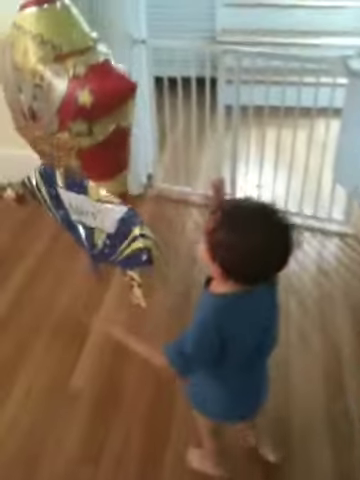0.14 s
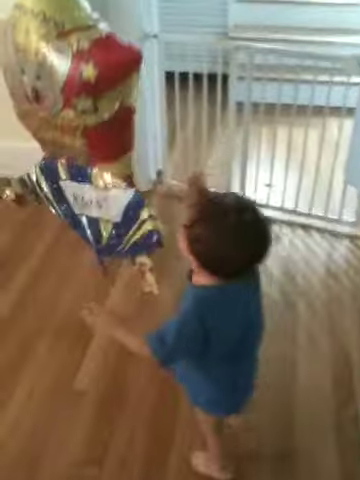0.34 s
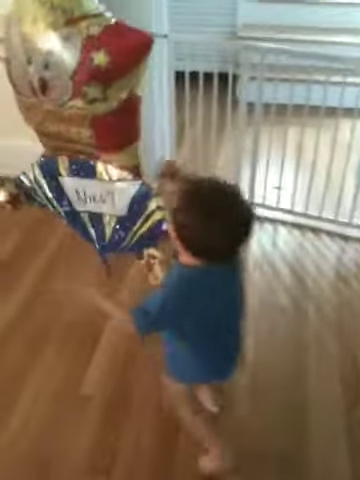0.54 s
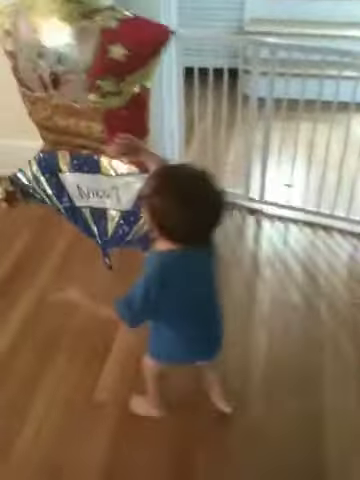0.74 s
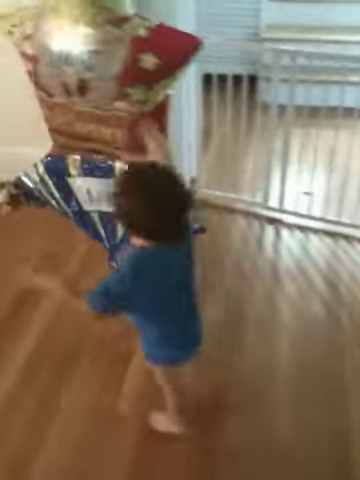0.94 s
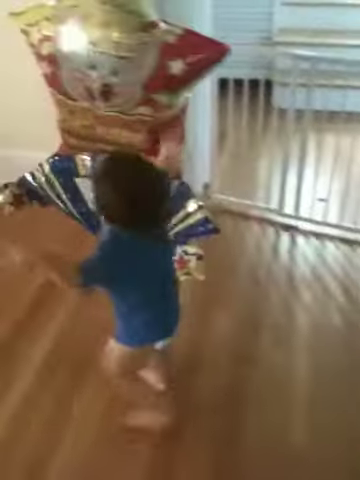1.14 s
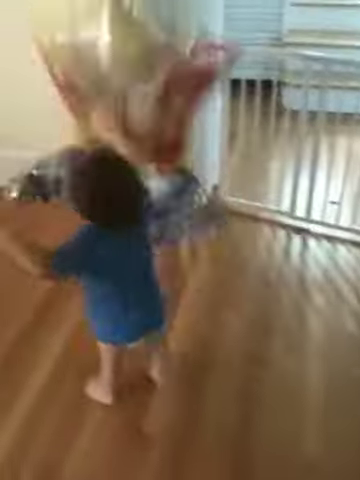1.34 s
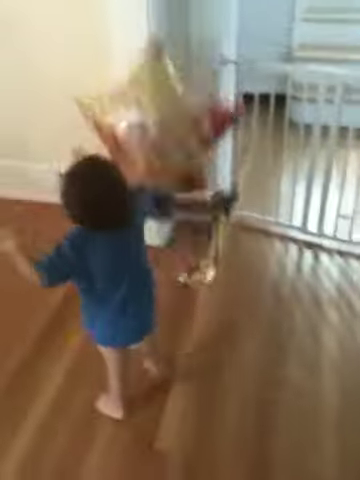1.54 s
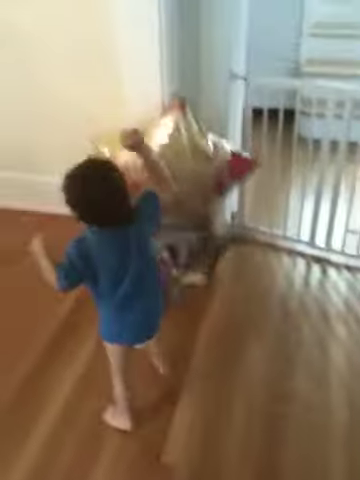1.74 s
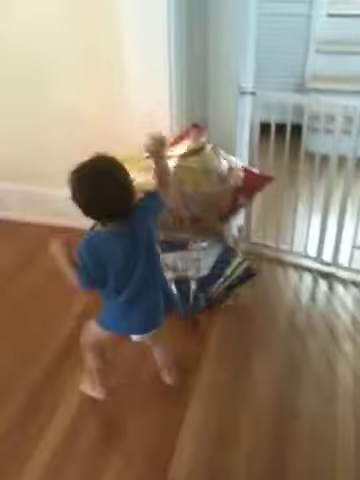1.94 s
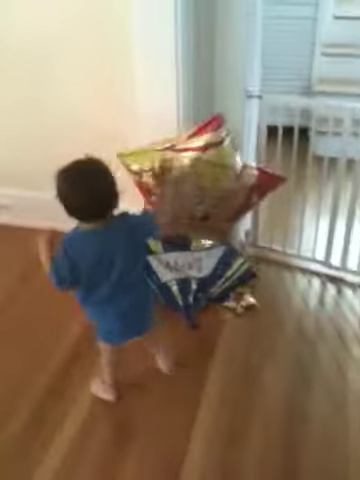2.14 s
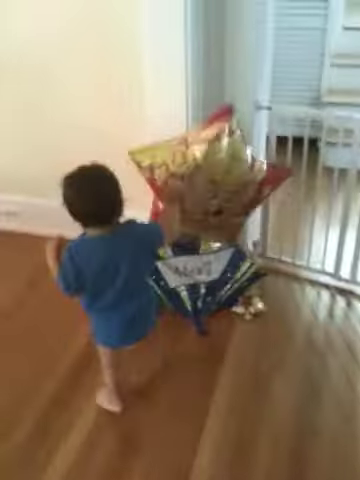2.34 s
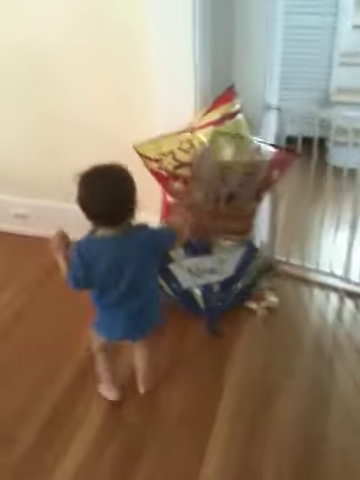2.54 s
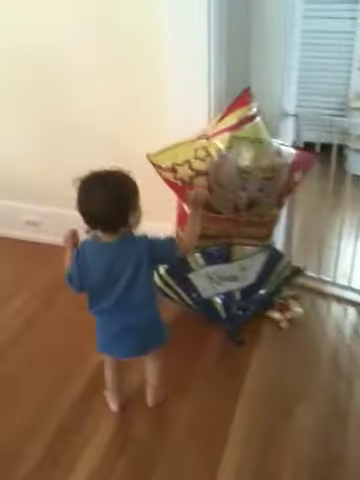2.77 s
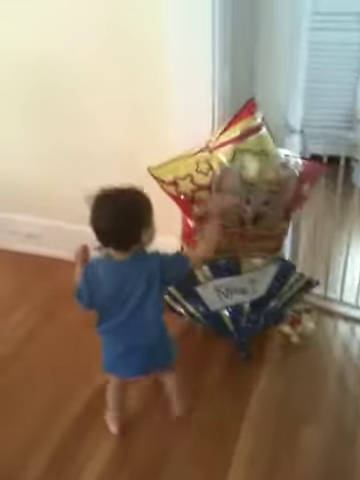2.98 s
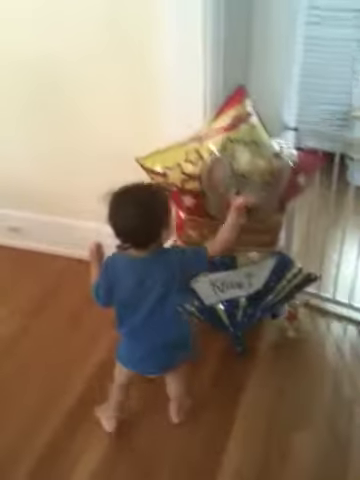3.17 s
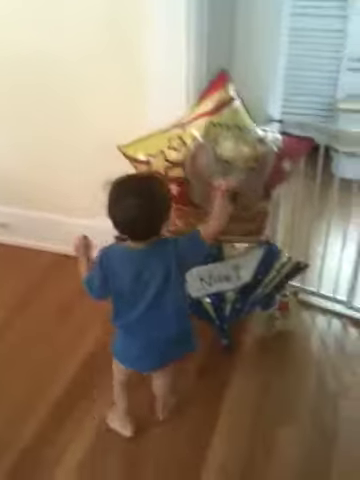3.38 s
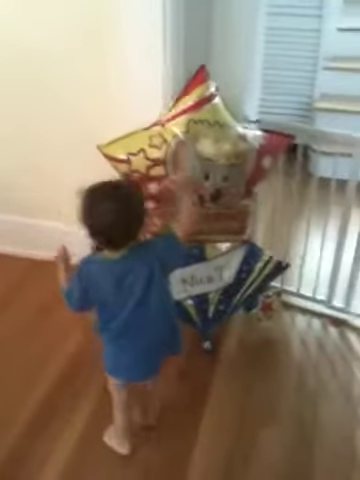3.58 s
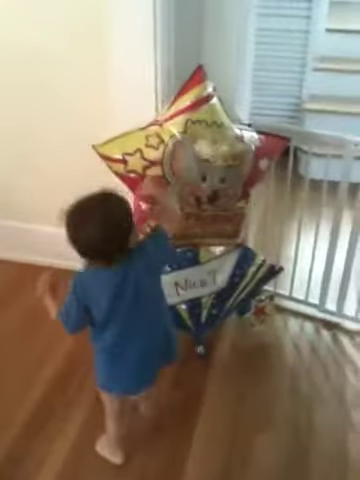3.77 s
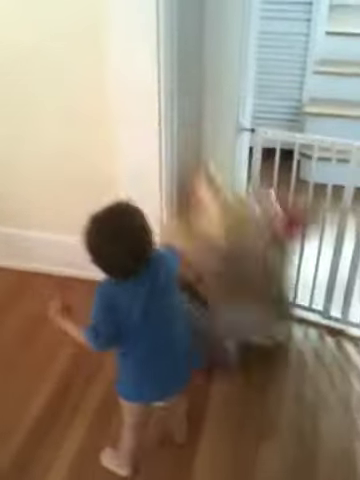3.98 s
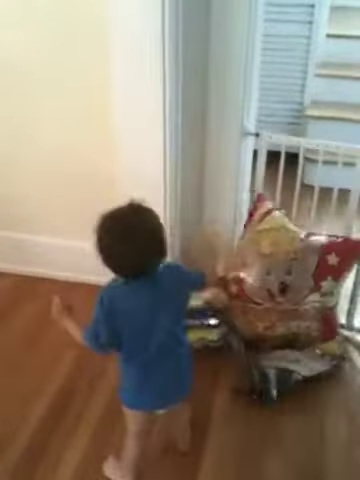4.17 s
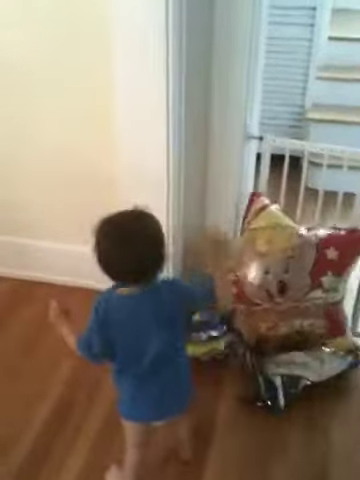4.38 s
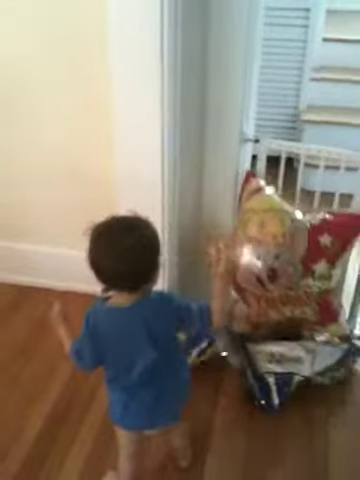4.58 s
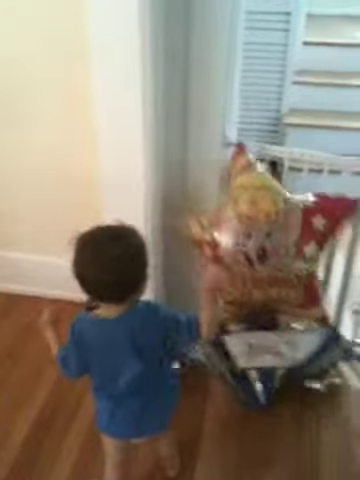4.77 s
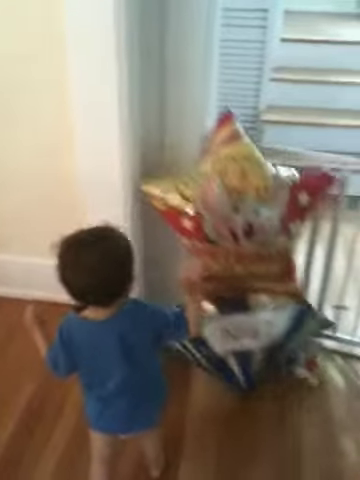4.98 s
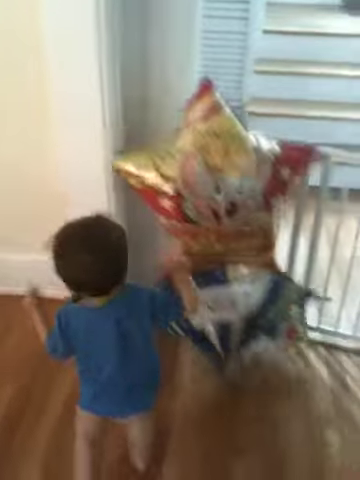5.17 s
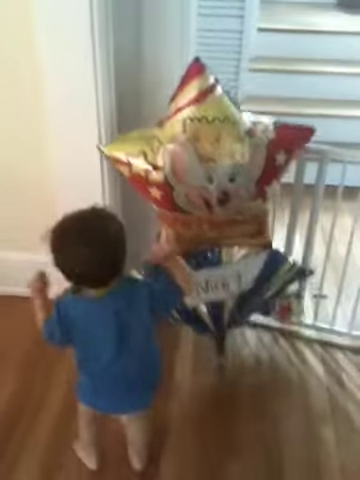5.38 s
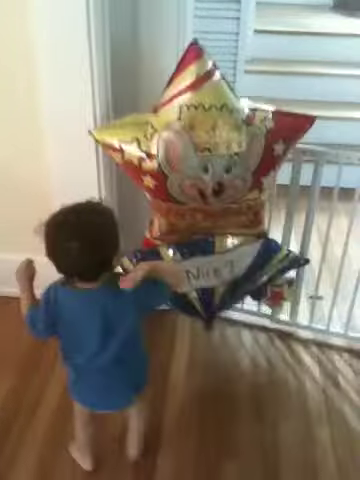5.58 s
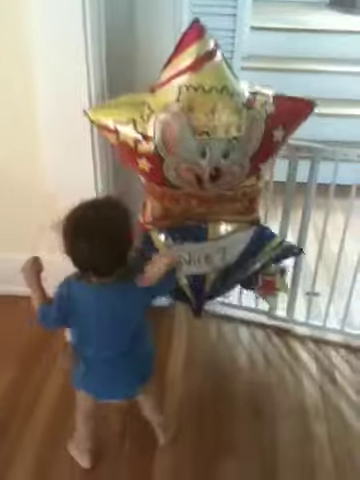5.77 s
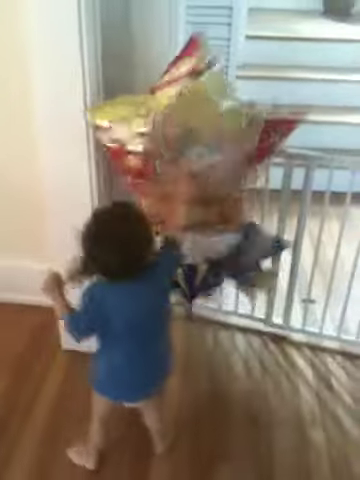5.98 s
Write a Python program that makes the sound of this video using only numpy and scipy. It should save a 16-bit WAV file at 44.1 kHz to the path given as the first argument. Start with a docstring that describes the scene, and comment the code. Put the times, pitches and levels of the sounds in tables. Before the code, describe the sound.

Small hands smack a large gas-filled foil balloon, sharp crackles and hollow drumming ringing through a hallway, with faint pats, rustling and one close knock.

```python
"""A toddler bats a big foil balloon about a bare hallway with a wooden floor, under the steady hush of the house.
First light pats pop creases in the foil and bare feet pad on the boards; then a hard slap buckles the skin
in a rush of snaps and drums on the gas inside. Bumps follow, and creases tick as the balloon drifts.
Something knocks close by with a hollow ring, a second hard slap lands, and pats, steps and rustling carry on.
Decaying noise echoes make the hallway ring behind it all; a small microphone thins the bass and cuts the top."""
import sys
import numpy as np
from scipy import signal
from scipy.fft import rfft, irfft
from scipy.io import wavfile
from scipy.ndimage import uniform_filter1d

SR = 44100
rng = np.random.default_rng(int(sys.argv[2]) if len(sys.argv) > 2 else 0)


def wrap_up_sound(samples):
    """Save the sound to the file named by the first command line argument, as 16-bit audio."""
    columns = np.atleast_2d(samples).T
    # keep every value between -1 and 1, then stretch to whole-number steps
    tamed = np.clip(columns, -1, 1)
    steps = np.round(tamed * 32767).astype(np.int16)
    wavfile.write(sys.argv[1], SR, steps)


N = 265482
TIME = np.arange(N) / SR
# All levels in the tables are relative: each source also has a direct and an echo gain of its own.

# Hard slaps on the foil: start_s, finger_level_db, palm_delay_s, palm_level_db, spring_back_delay_s
SLAP_TIMES = [(1.410, -3, .018, -1, .045), (3.991, -0.7, .024, 5.5, .073)]
# The balloon bumping the wall and the hand afterwards: start_s, level_db
BUMP_TIMES = [(1.520, -8), (1.606, -9.5), (1.640, -11.5), (4.272, -15)]
# One bump: crumple_decay_s, drum_re_crackle_db, drum_tilt_db_per_octave
BUMP_BLOW = (0.026, -1, 0.84)
# The three stages of every slap, same columns as the bump
FINGERS, PALM, SPRING_BACK = (0.017, -4.5, -5.5), (0.012, -2.2, -1.3), (0.014, -0.65, -0.97)
SPRING_BACK_DB = -0.54  # the skin's own tension sets this, however hard the slap


def blows():
    """A slap is fingers, palm and the skin springing back; a bump is a single blow."""
    # start_s, level_db, crumple_decay_s, drum_re_crackle_db, drum_tilt_db_per_octave
    rows = [(start_s, level_db, *BUMP_BLOW) for start_s, level_db in BUMP_TIMES]
    for start_s, finger_db, palm_delay_s, palm_db, spring_delay_s in SLAP_TIMES:
        rows.append((start_s, finger_db, *FINGERS))
        rows.append((start_s + palm_delay_s, palm_db, *PALM))
        rows.append((start_s + spring_delay_s, SPRING_BACK_DB, *SPRING_BACK))
    return rows


# Resonances of the gas and taut skin: pitch_hz, level_db, t60_s
DRUM_MODES = [(111, -1, 0.092), (172, 4.5, 0.44), (194.3, 3, 0.38), (247.3, 5, 0.15), (306.7, 5, 0.19),
              (340, -2, 0.29), (385, -17, 0.21), (432.2, 3.5, 0.25), (526.5, 4.5, 0.27), (585.5, -4, 0.3),
              (637, -7, 0.18), (888, 12, 0.16), (1000, -10, 0.29), (1112, 4, 0.18), (1370, -2, 0.16)]
# Spectrum of buckling foil: frequency_hz, level_db_per_hz
BUCKLE_SPECTRUM = [(60, -23), (85, -28), (125, -20), (170, -9), (300, -1), (520, -2.5), (700, -9),
                   (950, -6), (1600, -8), (2300, -6.3), (3200, -10), (4700, -16.5), (9500, -19),
                   (15700, -29.5)]


def slaps(echoes, lowest_hz=105):
    """The foil buckles in a burst of snaps while the gas-filled body booms."""
    foil = np.zeros(N)
    drums = np.zeros((len(echoes), N))
    for k, (start_s, level_db, decay_s, drum_db, tilt_db) in enumerate(blows()):
        burst = crumple(decay_s, per_s=5000, spread_db=3.0, swell=0.07)
        add(foil, start_s, from_db(level_db) * burst)
        drum_blow = ring(DRUM_MODES, spread_db=2.0, tilt_db=tilt_db)
        add(drums[k % len(echoes)], start_s, from_db(level_db + drum_db) * drum_blow)
    snapping = scattered(foil, echoes, direct_db=-4.5, echo_db=1.0)
    crackle = through(snapping, colour(BUCKLE_SPECTRUM))
    boom = sum(in_hall(drum, echo, direct_db=-5.5, echo_db=-17) for drum, echo in zip(drums, echoes))
    # the boom stays clear of the deep bass
    return crackle + cut(boom, lowest_hz, "high", order=4)


# Light pats and creases popping: start_s, level_db, crinkle_level_db
PAT_TIMES = [(.002, -36.5, -46), (.199, -34, -37.5), (0.556, -24.5, -39), (.780, -28.5, -41),
             (.849, -25, -32), (1.128, -32, -36.5), (1.892, -22, -21), (2.098, -25.5, -29),
             (3.207, -33, -38), (3.293, -44, -35), (3.465, -36, -33.5), (4.697, -27, -38),
             (4.786, -27, -30), (5.060, -26.5, -30.5)]
# Spectrum of the fine wrinkles: frequency_hz, level_db_per_hz
CRINKLE_SPECTRUM = [(1000, -34), (3500, -1), (6000, -4.5), (9300, -2), (11500, -6), (16000, -17)]
PAT_BAND_HZ = (550, 3970)  # where the flipping creases sound
PAT_DECAY_S, CRINKLE_DECAY_S = 0.016, 0.011
POP_DB = -6  # the first crease to give way, against the burst of small ones


def pats(echoes):
    """A light touch pops one crease and flips a few more; tiny wrinkles add a fine crinkle on top."""
    creases, wrinkles = np.zeros(N), np.zeros(N)
    low_hz, high_hz = PAT_BAND_HZ
    for start_s, level_db, crinkle_db in PAT_TIMES:
        flips = crumple(PAT_DECAY_S, per_s=4000, spread_db=2.5, swell=0.1)
        flips[0] += from_db(POP_DB)
        burst = scattered(flips, echoes[:3], direct_db=-4.0, echo_db=-2.0, spread_s=0.0016)
        burst = cut(burst, low_hz, "high")
        burst = cut(burst, high_hz, "low", order=8)
        add(creases, start_s, from_db(level_db) * unit_energy(burst))
        crinkle = crumple(CRINKLE_DECAY_S, per_s=2300, spread_db=1.0)
        add(wrinkles, start_s, from_db(crinkle_db) * crinkle)
    fine = scattered(wrinkles, echoes, direct_db=-7, echo_db=-3.0)
    return creases + through(fine, colour(CRINKLE_SPECTRUM))


# The skin flexing as the balloon drifts, one list of points for each spell: time_s, level_db
RUSTLE_SPELLS = [
    [(.46, -79), (.58, -63)],
    [(1.37, -68), (1.44, -54.5)],
    [(1.84, -52), (2.13, -53), (2.338, -64), (2.368, -57), (2.714, -62), (2.81, -67)],
    [(2.97, -64.5), (3.072, -67.5), (3.504, -66.5), (3.696, -92), (3.88, -67.5), (3.97, -77)],
    [(4.48, -56.5), (4.684, -59), (4.714, -55), (4.878, -55), (5.058, -53.5), (5.444, -69.5), (5.602, -60),
     (5.864, -63), (6.02, -68.5)],
]
# Spectrum of the drifting skin: frequency_hz, level_db_per_hz
RUSTLE_SPECTRUM = [(120, -28.5), (190, -1), (330, -1), (480, -0.5), (700, -6), (1200, -3.5), (2100, -1.5),
                   (2450, 0.5), (2900, -2), (4900, -9.5), (8300, -11), (12700, -17), (15700, -25)]
RUSTLE_DB = -1.15  # the drifting skin against the blows


def rustle(echoes, hall_lag_s=0.019):
    """The more the skin flexes, the more often and the louder its creases tick."""
    flex = np.zeros(N)
    for spell in RUSTLE_SPELLS:
        times_s, levels_db = np.transpose(spell)
        # flexing leads its table a little, as the hallway answers late
        flex += from_db(np.interp(TIME + hall_lag_s, times_s, levels_db, left=-120, right=-120))
    ticks_per_s = 800 * np.sqrt(flex / flex.max()) + 250
    ticks = snaps(ticks_per_s, spread_db=4.0, size=N)
    # even out the power of the ticks, so that the flexing alone sets the loudness
    power = uniform_filter1d(ticks ** 2, size=4096)
    ticks = ticks / np.sqrt(np.maximum(power, 1e-6))
    ticking = scattered(ticks * flex, echoes, direct_db=-4.5, echo_db=-1.1)
    return from_db(RUSTLE_DB) * through(ticking, colour(RUSTLE_SPECTRUM))


# A nearby knock: start_s, level_db
KNOCK_TIMES = [(2.833, -28.5), (2.8408, -15.5), (2.850, -21.5)]
# What the knock rings with: pitch_hz, level_db, t60_s
KNOCK_MODES = [(176, -7, .07), (276, -2, .06), (337, 1, 0.094), (409, 1, 0.15), (590, -4.5, .02)]
# Spectrum of the rough contact: frequency_hz, level_db_per_hz
KNOCK_SPECTRUM = [(100, -19), (200, 2.5), (550, -1), (1000, -6), (1500, -10), (3000, -11.5), (5000, -13),
                  (8000, -22.5), (16000, -33)]


def knock(echoes, contact_db=-2.5, body_db=-2.5, lowest_hz=125):
    """A close knock: a short rough contact that carries into the hallway, on top of a hollow ring."""
    body, contact = np.zeros(N), np.zeros(N)
    for start_s, level_db in KNOCK_TIMES:
        add(body, start_s, from_db(level_db + body_db) * ring(KNOCK_MODES, spread_db=5))
        rough = crumple(0.0053, per_s=3300, spread_db=0.0)
        add(contact, start_s, from_db(level_db + contact_db) * rough)
    click = through(in_hall(contact, echoes[1], direct_db=-4, echo_db=-4), colour(KNOCK_SPECTRUM))
    hollow = in_hall(body, echoes[0], direct_db=0, echo_db=-7.5)
    return cut(hollow + click, lowest_hz, "high", order=4)


# Bare feet on the boards: start_s, level_db
STEP_TIMES = [(.004, -30), (.125, -32.5), (.556, -32), (0.849, -26), (1.109, -21.5), (1.845, -25.5),
              (2.358, -22.5), (4.41, -30), (5.066, -30), (5.556, -30)]
# Spectrum of the soles: frequency_hz, level_db_per_hz
STEP_SPECTRUM = [(100, -32), (170, -2), (300, 2.5), (480, -5), (800, -16), (2000, -17.5), (8000, -62)]


def footsteps(echoes):
    """Soft soles land with a dull pad, a short burst of tiny contacts with little treble."""
    landings = np.zeros(N)
    for start_s, level_db in STEP_TIMES:
        add(landings, start_s, from_db(level_db) * crumple(0.022, per_s=1700, spread_db=1.5))
    padding = scattered(landings, echoes, direct_db=-5.5, echo_db=-5.5)
    return through(padding, colour(STEP_SPECTRUM))


# How long the hallway rings: frequency_hz, t60_s
HALL_DECAY = [(80, 0.099), (200, 0.8), (500, 0.69), (2500, 0.81), (7000, 0.87), (15000, 0.71)]


def hallway(build_s=0.0035, early_db=3.5, early_s=0.031):
    """Diffuse echo of the hallway: near walls answer strongly, then each band dies at its own rate."""
    t = TIME[:SR]
    white = rfft(rng.standard_normal(len(t)))
    hz = np.fft.rfftfreq(len(t), 1 / SR)
    tail = np.zeros(len(t))
    for k, (_, t60_s) in enumerate(HALL_DECAY):
        # each band fades into its neighbours
        band = at_hz([(row[0], j == k) for j, row in enumerate(HALL_DECAY)], hz)
        tail += irfft(white * band, len(t)) * from_db(-60 * t / t60_s)
    build = 1 - np.exp(-t / build_s)
    early_lift = from_db(early_db * np.exp(-t / early_s))
    return unit_energy(tail * build * early_lift)


# Spectrum of the house air: frequency_hz, level_db_per_hz
AIR_SPECTRUM = [(150, -7), (200, -0.5), (300, -2), (440, 0.5), (620, -8), (820, -10.5), (1000, -5.5),
                (1400, -12.5), (2400, -8), (4200, -16.5), (8000, -20.5), (15700, -23.5)]
AIR_DB = -68


def room_air():
    """The steady hush of the house: coloured noise without bass."""
    hush = through(rng.standard_normal(N), colour(AIR_SPECTRUM))
    return from_db(AIR_DB) * cut(hush, 167, "high", order=10)


def snaps(per_s, spread_db, size):
    """Creases flipping at random moments: many small ones, a few large."""
    levels_db = spread_db * np.minimum(rng.exponential(1, size), 4)
    sizes = from_db(levels_db) * rng.choice([-1, 1], size)
    return sizes * (rng.random(size) < per_s / SR)


def crumple(decay_s, per_s, spread_db, swell=0.16):
    """A blow sets off an avalanche of snaps that swells quickly and dies away."""
    t = TIME[:SR]
    envelope = np.exp(-t / decay_s) * (1 - np.exp(-t / (swell * decay_s)))
    return unit_energy(snaps(per_s, spread_db, len(t)) * envelope)


def ring(modes, spread_db, tilt_db=0):
    """Every mode takes a random share; a negative tilt darkens the blow, a positive one brightens it."""
    t = TIME[:SR]
    shares = from_db(spread_db * rng.standard_normal(len(modes))) * rng.choice([-1, 1], len(modes))
    total = np.zeros(len(t))
    for share, (hz, level_db, t60_s) in zip(shares, modes):
        mode = unit_energy(np.sin(2 * np.pi * hz * t) * from_db(-60 * t / t60_s))
        total += share * from_db(level_db + tilt_db * np.log2(hz)) * mode
    return unit_energy(total)


def scattered(clicks, echoes, direct_db, echo_db, spread_s=0.0032):
    """Each click starts at a random spot, spreads over the surface and takes that spot's path round the hallway."""
    spot = rng.integers(0, len(echoes), len(clicks))
    out = np.zeros(len(clicks))
    for k, echo in enumerate(echoes):
        spreading = np.exp(-TIME[:len(echo)] / spread_s)
        surface = unit_energy(rng.standard_normal(len(echo)) * spreading)
        path = from_db(direct_db) * surface + from_db(echo_db) * echo
        out += through(clicks * (spot == k), path)
    return out


def in_hall(x, echo, direct_db, echo_db):
    """Direct sound plus its echo."""
    return from_db(direct_db) * x + from_db(echo_db) * through(x, echo)


def colour(spectrum, size=4096):
    """Causal (minimum-phase) response with a given spectrum and unit energy."""
    level_db = at_hz(spectrum, np.fft.rfftfreq(size, 1 / SR))
    cepstrum = irfft(np.log(from_db(level_db)))
    # fold the cepstrum onto positive times
    cepstrum[1:size // 2] *= 2
    cepstrum[size // 2 + 1:] = 0
    return unit_energy(irfft(np.exp(rfft(cepstrum))))


def from_db(db):
    """Decibels to gain."""
    return 10 ** (np.asarray(db) / 20)


def unit_energy(x):
    """Scales a sound to an energy of one."""
    return x / np.sqrt(np.sum(x ** 2) + 1e-20)


def at_hz(points, hz):
    """A table read on a log-frequency axis."""
    point_hz, values = np.array(points).T
    return np.interp(np.log(np.maximum(hz, 1)), np.log(point_hz), values)


def add(track, start_s, sound):
    """Mixes a sound in at a given time."""
    start = max(0, round(start_s * SR))
    track[start:start + len(sound)] += sound[:N - start]


def through(x, response):
    """Filters a sound with an impulse response."""
    return signal.fftconvolve(x, response)[:len(x)]


def cut(x, hz, kind, order=2):
    """High- or low-pass."""
    sos = signal.butter(order, min(hz, 0.45 * SR), kind, fs=SR, output="sos")
    return signal.sosfilt(sos, x + 1e-18)


def scene():
    """Six paths through the same hallway serve all the sources."""
    echoes = [hallway() for _ in range(6)]
    light = pats(echoes) + rustle(echoes) + footsteps(echoes)
    light = cut(light, 160, "high", order=8)  # light contacts carry no bass
    return (slaps(echoes) + knock(echoes) + light + room_air())[None]


CUTOFF_HZ = 15850


def record(dry):
    """A small microphone: no deep bass, a steep cut at the top."""
    thin = cut(dry, 57, "high", order=3)
    steep = signal.ellip(12, 0.1, 80, CUTOFF_HZ, fs=SR, output="sos")  # 0.1 dB ripple, 80 dB down
    return signal.sosfilt(steep, thin)


dry = scene()
out = record(dry)
wrap_up_sound(out)
```